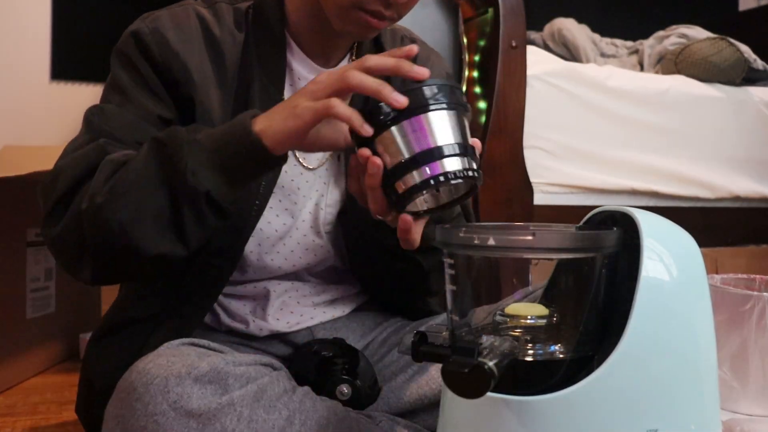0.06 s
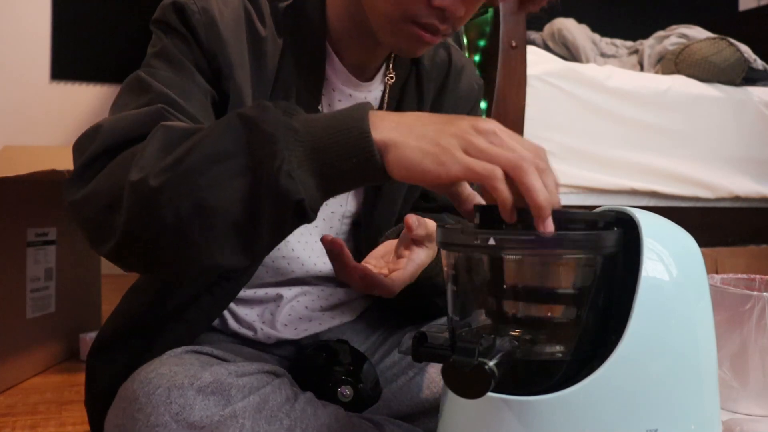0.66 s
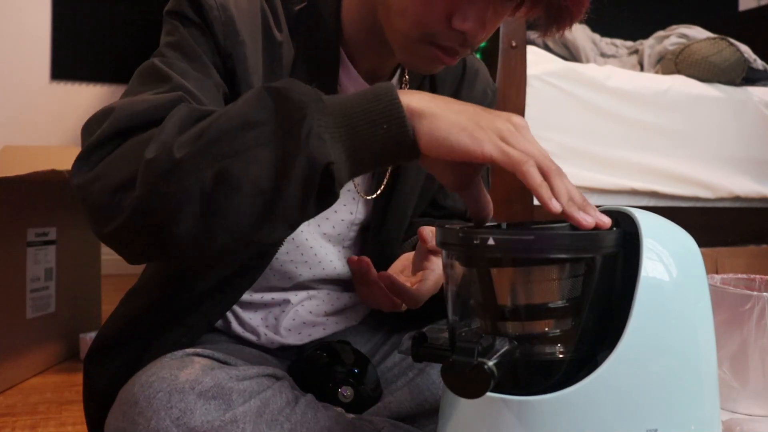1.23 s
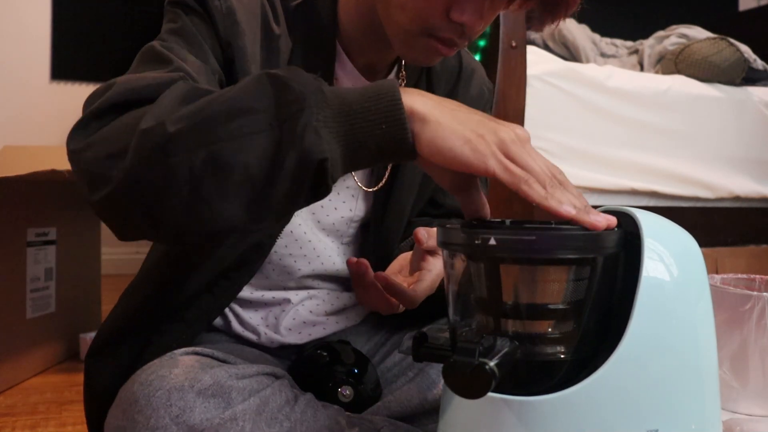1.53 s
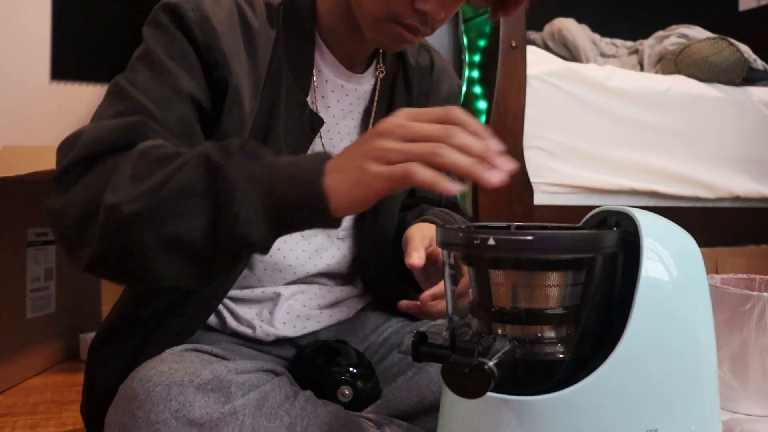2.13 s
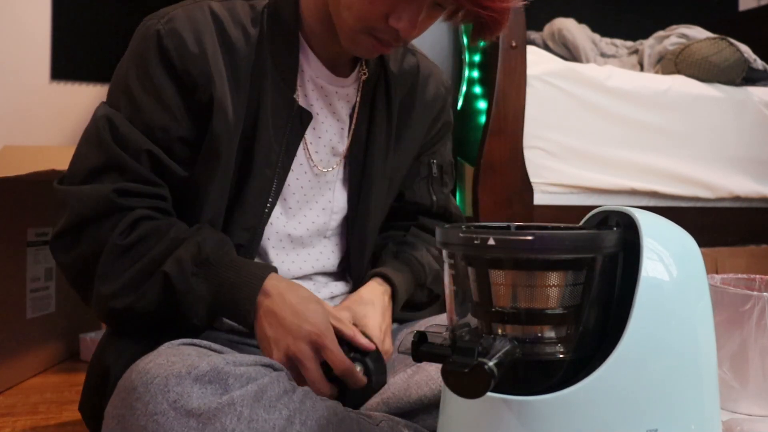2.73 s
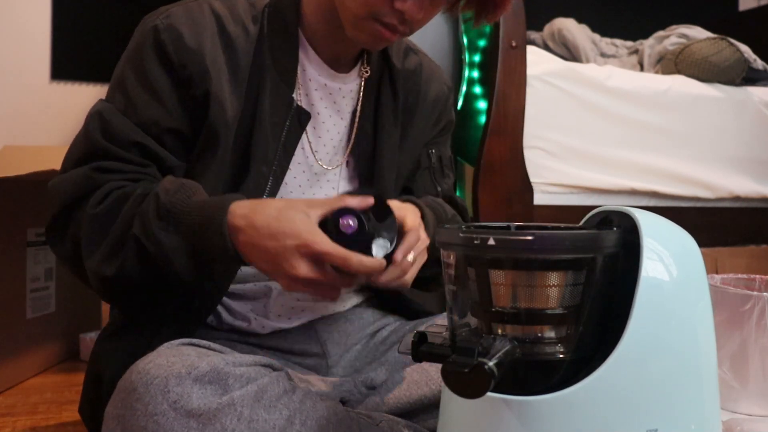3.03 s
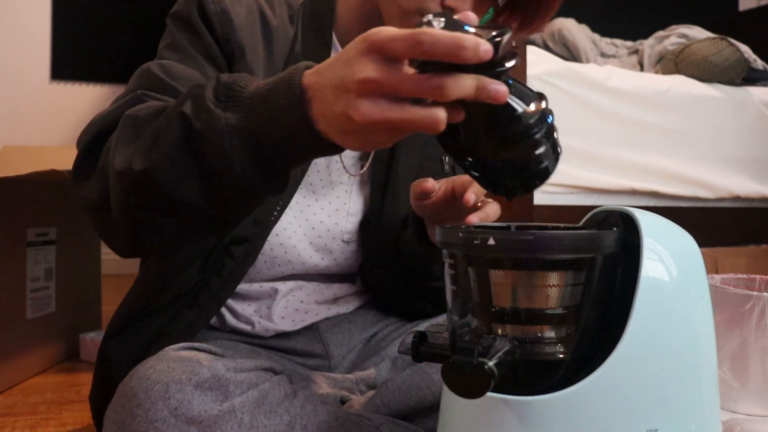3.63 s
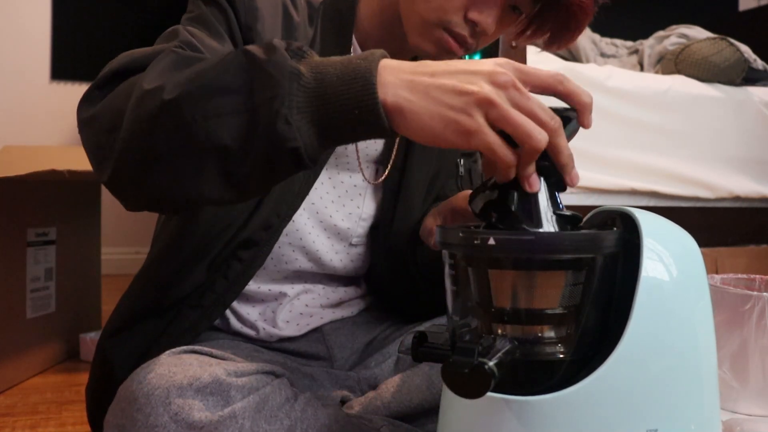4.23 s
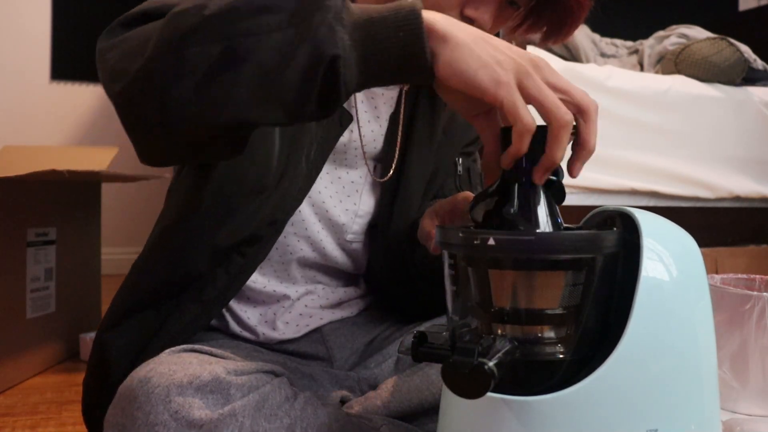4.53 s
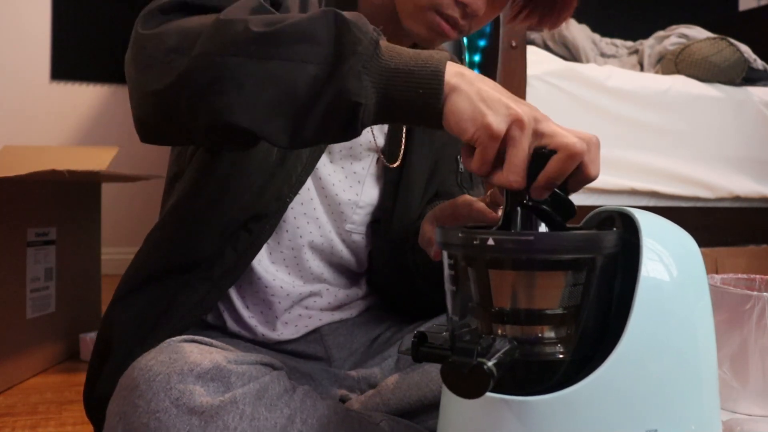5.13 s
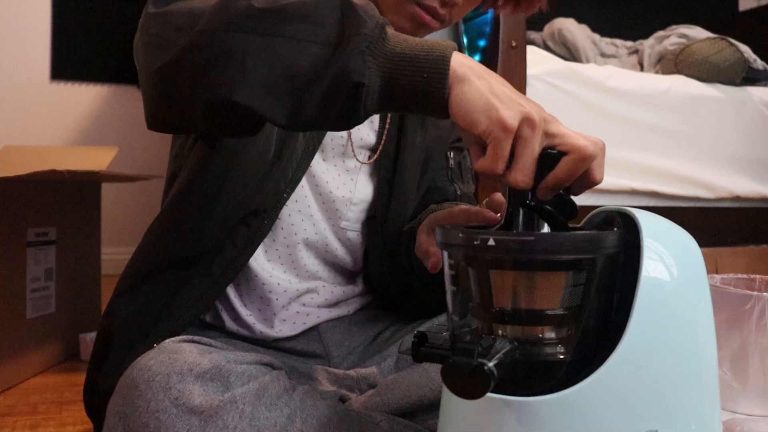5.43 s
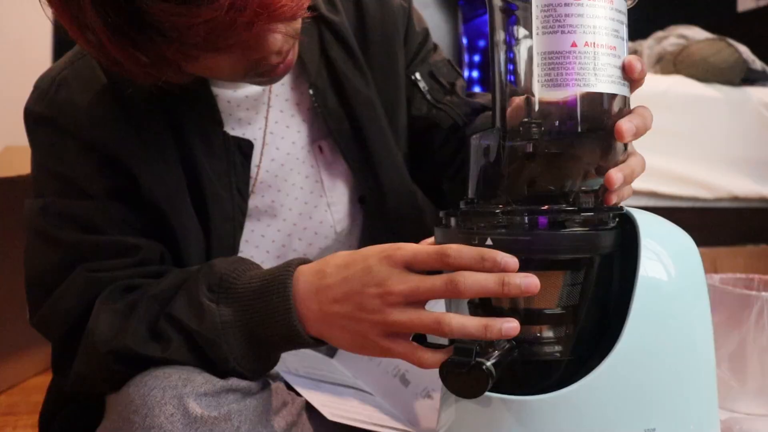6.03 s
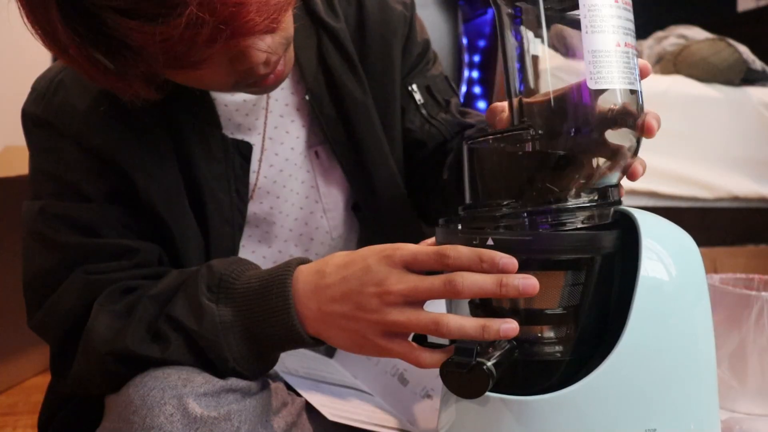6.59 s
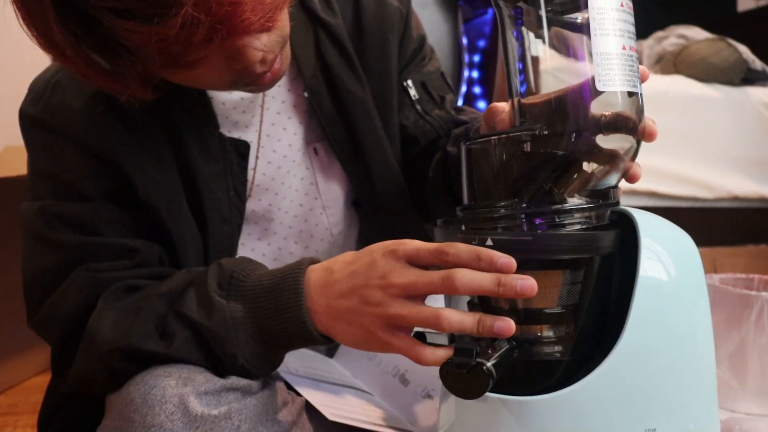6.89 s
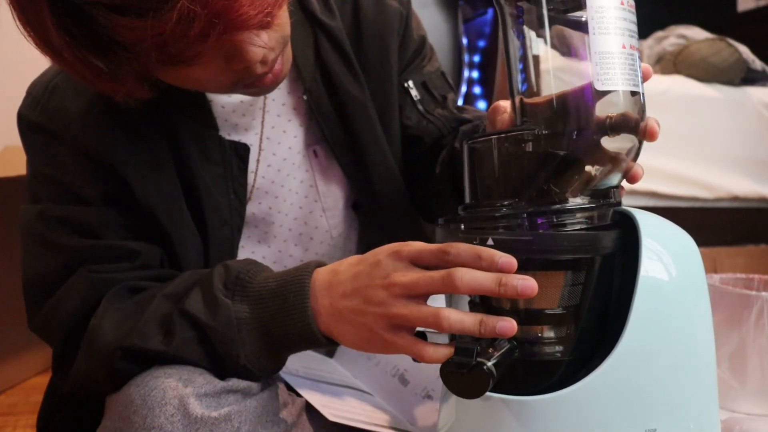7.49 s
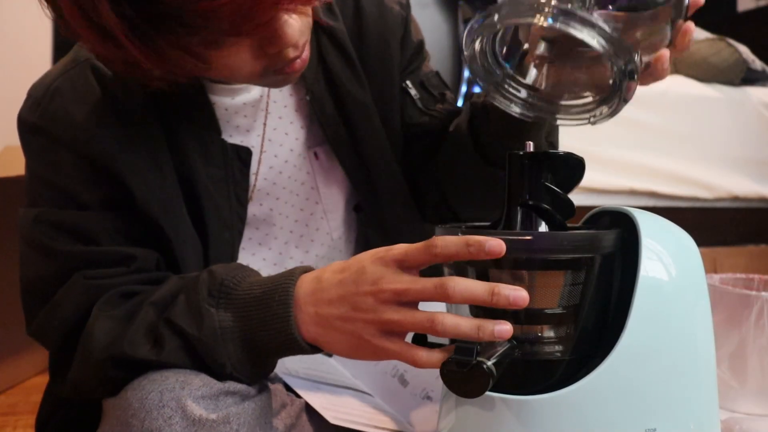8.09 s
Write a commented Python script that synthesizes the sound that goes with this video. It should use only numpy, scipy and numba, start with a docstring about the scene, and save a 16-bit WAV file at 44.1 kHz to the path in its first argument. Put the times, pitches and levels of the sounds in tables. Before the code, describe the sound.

A juicer is assembled close by in a small, quiet bedroom, over a faint steady appliance hum. A sleeve rustles softly, then at about 0.7 seconds a steel and plastic strainer clatters into the bowl, with smaller clicks until 1.2 seconds. At 1.8 it snaps home with a loud clack and a short hollow ring. Soft jacket rustles and swishes fill the gap until about 4 seconds. From 4.2 the pressing screw knocks and slides into place, grinding briefly and thumping the base on the floor near 4.9 and 5.1, where a hard clack sets the steel mesh ringing briefly. A few light ticks follow. From 6 to 7.7 seconds the plastic feed funnel rubs and clicks on the rim, with a faint squeak near 6.8 and the strongest knocks and scrape around 7.2 to 7.3. Two light taps come near 8 and 8.2 seconds as it lifts away.

```python
"""A sleeve rustles softly, then a steel and plastic strainer drops into a juicer's bowl and snaps home.
The auger (the pressing screw) is worked onto its shaft; the hopper (the feed funnel) is tried on the
rim and lifted off. Knocks make the parts ring, rubbing parts stick and slip, and the base thumps
the floor. It all happens close by in a small bedroom, over a faint appliance hum.
An automatic volume control turns the sound down after loud blows."""
import sys
import numpy as np
from scipy import signal
from scipy.fft import rfft, irfft
from scipy.io import wavfile
from scipy.ndimage import uniform_filter1d
from numba import njit

SR = 44100
rng = np.random.default_rng(int(sys.argv[2]) if len(sys.argv) > 2 else 0)


def store_pcm(level_fs):
    """Save levels as 16-bit WAV."""
    pcm = np.round(np.clip(level_fs, -1, 1) * 32767).astype(np.int16)
    wavfile.write(sys.argv[1], SR, np.atleast_2d(pcm).T)


N = 368235
TIME = np.arange(N) / SR
RING_TIME = TIME[:SR // 3]

# Each part's knocks. Clack (upper middle) and tick (treble) are compared with the body (lower middle).
# (time [s], relative force [dB], clack [dB], tick [dB], chatter time [s])
STRAINER_HITS = [(.6745, -5.5, -3.5, -18.5, 0.0023), (.7062, -22, -9.5, -10, 0.0037),
                 (.7287, -14, 4, -19.5, .0004), (.7417, -9, 3, -9, .0006), (.7545, -22.5, -5, -9.5, 0.0032),
                 (.799, -15.5, -11.5, -17, 0.0016), (.809, -20.5, -13.5, -15.5, .001),
                 (.934, -41, -7, -12.5, 0.0061), (.979, -9, -11.5, -26, 0.00055),
                 (1.043, -34, -3.5, -33, 0.0071), (1.065, -28.5, -3, -18, 0.0025),
                 (1.077, -24.5, -9.5, -19, 0.0031), (1.115, -37, -2, -24.5, 0.0059),
                 (1.153, -24, -9.5, -22, .003), (1.503, -27.5, -10.5, -17, 0.013),
                 (1.707, -44, -3.5, -21, 0.0085), (1.753, -29.5, -11.5, -27, 0.0059),
                 (1.768, -22.5, -3, -23, .012), (1.778, 0.5, -5, -13, .0046),
                 (2.122, -42, -5.5, -14, 0.0027)]
AUGER_HITS = [(2.539, -55, 5.5, -0.5, 0.0012), (4.2185, -28, -13, -25, 0.0021),
              (4.225, -28.5, -9.5, -23, 0.0021), (4.2435, -30, -1.5, -15, .004),
              (4.2493, -16.5, -12, -26.5, 0.0017), (4.3295, -25, -5.5, -20.5, 0.0043),
              (4.349, -19, -12.5, -23.5, 0.0045), (4.614, -27.5, -13, -21.5, 0.0034),
              (4.7645, -18, -16, -34, 0.0035), (4.778, -20, -8, -17, 0.0023),
              (4.868, -17, -5.5, -31, 0.0074), (4.893, -19, -13, -27, 0.0054), (4.921, -24, -5, -18, .004),
              (4.939, -31.5, -8, -15.5, 0.0067), (5.03, -24.5, -15, -29.5, 0.00085),
              (5.12, -23.5, 6, -9, 0.0072), (5.132, -12, -25, -24, 0.00051),
              (5.1405, -10, -6, -4.5, 0.0014), (5.1495, -12.5, -25.5, -22, 0.0031),
              (5.358, -45.5, -7.5, -23, 0.0026), (5.431, -44, -12, -23, .005),
              (5.47, -39.5, -13, -35, .006), (5.518, -33.5, -13, -26, .01), (5.538, -31.5, -6, -20, .003)]
HOPPER_HITS = [(6.031, -31, -4, -21, 0.0096), (6.127, -40.5, -5.5, -17, 0.0023),
               (6.304, -46, -4.5, -23, .003), (6.393, -48, -4.5, -30, 0.0012),
               (6.444, -46.5, -3, -23, 0.0022), (6.551, -21, -2.5, -13.5, 0.0068),
               (6.562, -23, -5, -13.5, 0.0033), (6.59, -27, -6.5, -16.5, 0.0056),
               (6.668, -26, -4.5, -21, 0.0047), (6.686, -18, -5.5, -18.5, 0.0026),
               (6.765, -32, -1, -28, 0.0013), (6.786, -25, -7, -20.5, 0.0077),
               (6.841, -38, -3, -11, 0.0089), (6.897, -32, -6, -12, 0.0025), (6.948, -31, -5, -19, 0.0052),
               (6.986, -40.5, -8, -12, 0.0023), (7.031, -36.5, -3.5, -20, 0.0099),
               (7.168, -30.5, -3, -12, 0.0021), (7.186, -14, -3.5, -19, 0.0052),
               (7.2725, -18.5, -0.5, -20, 0.0053), (7.285, -21.5, -17, -9, 0.011),
               (7.3155, -18.5, -4.5, -11, 0.0035), (7.349, -27.5, -6, -11.5, 0.0098),
               (7.375, -35.5, 0, -17, .0024), (7.513, -30, -6, -40, 0.0015),
               (7.522, -22, -3.5, -10.5, 0.0044), (7.535, -28.5, -2.5, -8, 0.0012),
               (7.567, -27.5, -5.5, -27, .008), (7.609, -38, -2, -21, 0.0031),
               (7.634, -34, -4, -26, 0.0047), (7.753, -47, -4, -12, 0.0044), (7.812, -43, -8, -42, .002)]
LIFTED_TAPS = [(7.973, -39.5, -3.5, -15, 0.0057), (8.224, -42.5, -5.5, -8.5, 0.0025)]  # the lifted hopper grazes the auger
# borders of the bass, body, clack and tick bands (frequency [Hz])
BAND_EDGES = [130, 540, 1100, 3400, 15000]
# Modes are the tones a part rings with; a ring time (t60) is how long one takes to fade by 60 dB.
# (pitch [Hz], level above the part's click [dB], ring time [s])
STRAINER_MODES = [(170, -6, 0.037), (425, 13.5, 0.043), (607, 6.5, 0.13), (674, 12.5, 0.047),
                  (714.4, 17, 0.095), (832, 16.5, .03), (1410, 11.5, 0.011), (1340, 6, 0.014),
                  (1744, 8.5, 0.013), (2010, 5.5, 0.02), (2544, 13.5, 0.023), (3810, 11, 0.032),
                  (6400, -7, .005), (8300, 4, 0.0017)]
AUGER_MODES = [(451, 13.2, 0.033), (630, 14.4, 0.034), (708, 8.2, 0.067), (750, 4.6, 0.08),
               (1426, 12.3, 0.029), (1845, 8, 0.0068), (2340, 2.3, 0.019), (2700, 3, 0.016),
               (3020, 2.8, .022), (5630, 2.5, .008), (8550, 3, 0.01)]
HOPPER_MODES = [(417, 19.9, 0.062), (480, 10.8, 0.033), (586, 2, 0.0079), (708, 9.5, 0.032),
                (920, 1.3, 0.094), (1399, 14.1, 0.014), (1896, 12, 0.0041), (2580, 1.6, 0.0072),
                (3300, 0.61, 0.06), (3940, 3.4, 0.014), (7800, 3.6, 0.0055)]
# tones of the steel mesh and the bowl (pitch [Hz], relative level [dB], ring time [s])
MESH_MODES = [(5300, -8, .22), (5870, -9, 0.22), (5670, 5, .15), (5560, 1.5, .15), (6120, -5.5, 0.24),
              (6030, -11, 0.18), (6900, 8.5, 0.15)]
BOWL_MODES = [(315, -5.5, 0.27), (550, 0, .16), (690, -1, .2), (757, -1, .22), (876, -5, .2)]
# blows that set the mesh and the bowl ringing (time [s], level [dB])
MESH_HITS = [(0.7412, -51.5), (4.775, -46.5), (5.1378, -18.5)]
BOWL_HITS = [(.7417, -33), (1.778, -23), (5.1405, -31)]
# pushes that rock the motor base (time [s], level [dB], ring time [s])
THUMPS = [(0.676, -35.5, 0.042), (4.249, -47, .18), (4.347, -49, .24), (4.868, -31.5, .3),
          (5.119, -25, .27), (6.561, -47, 0.19), (6.686, -51, .17), (7.297, -43, 0.071)]
# rubbing strokes (middle time [s], length [s], level [dB])
AUGER_GRIND = [(4.871, 0.0086, -21.5), (4.905, 0.016, -20.5), (5.118, 0.02, -12)]  # the auger's ridges grind down the shaft
RIM_RUB = [(6.3, .4, -57), (6.61, 0.053, -33), (6.9, 0.98, -43.5), (7.2, 0.19, -38.5), (7.32, 0.07, -22.5),
           (7.59, 0.14, -41)]  # the hopper's rim turns on the bowl
BOWL_RUB = [(.645, .025, -45), (4.52, .28, -53), (4.665, .03, -46.5), (4.82, .3, -50.5)]  # a part slides down inside the bowl
ARM_MOVES = [(.07, 0.42, -54.5), (.68, 0.59, -59), (1.5, 1.8, -62), (2.45, .55, -53), (3.02, 0.28, -55),
             (3.33, 0.34, -55.5), (3.85, 1.1, -60.5), (5.94, 0.27, -52), (7.3, 1.1, -60)]  # the jacket sleeve rustles
# squeals of the turning rim (time [s], length [s], pitch [Hz], level [dB])
SQUEAKS = [(6.781, 0.084, 3990, -52.5), (7.066, 0.077, 3960, -65)]
# quick sleeve swishes (time [s], length [s], first pitch [Hz], last pitch [Hz], level [dB])
SWISHES = [(2.269, .13, 1466, 980, -51), (3.22, 0.16, 1416, 2040, -49.5)]
# how each noise is spread from low to high (frequency [Hz], relative level [dB])
GRIND_SPECTRUM = [(120, -7.5), (300, 14), (700, -9.5), (1200, -7), (2100, 0.5), (3400, -4), (5000, -14.5),
                  (9000, -23.5), (15000, -34.5)]
RIM_SPECTRUM = [(60, -12), (160, 2), (700, -0.5), (2000, -15), (4000, -16.5), (8500, -26), (10500, -32.5),
                (15500, -32)]
SLIDE_SPECTRUM = [(300, -2), (1200, -8), (2500, -4.5), (3700, -1.5), (5500, -11), (8500, -16.5),
                  (15000, -34)]
CLOTH_SPECTRUM = [(200, -26.5), (700, -1.5), (1400, 3), (2600, -1.5), (5000, -8), (8500, -10.5),
                  (10500, -16.5), (15500, -19.5)]
AIR_SPECTRUM = [(15, -43), (25, -8), (75, -5), (274, -7), (313, -7), (368, -3), (410, -8), (482, -5.5),
                (552, -13), (684, -12.5), (945, -11.5), (1300, -16), (2010, -22.5), (8130, -29.5),
                (15500, -34)]
MESH_SPECTRUM = [(3000, -30), (5200, 1), (5800, 9), (6700, 3.5), (7400, -24), (14000, -27)]
THUMP_SPECTRUM = [(12, -25.5), (32, -1), (50, 0), (80, 0.5), (130, -2), (230, -25.5), (900, -69)]
# echoes from the floor and nearby furniture (delay [s], gain [ratio])
REFLECTIONS = [(.0033, -0.012), (.0058, -0.25), (0.0138, .2), (0.016, -0.054)]
# tones of the appliance hum (pitch [Hz], average level [dB])
HUM = [(70, -63.5), (118.4, -66.5), (366.1, -59), (990.5, -84)]


def knocks(hits, modes, gain_db, chatter, room_db, low_hz):
    """Each knock is one blow and a burst of tiny bounces (chatter) that make the part ring."""
    out = np.zeros(N)
    n, attack = len(RING_TIME), int(.03 * SR)
    band_filters = [signal.butter(3, edges, "band", fs=SR, output="sos")
                    for edges in zip(BAND_EDGES, BAND_EDGES[1:])]
    for s, db, bass_db, clack_db, tick_db, chatter_s in hits:
        age = 2 * RING_TIME / max(chatter_s, 1e-4)
        force = chatter * slips(n, 5000, 4.7) * age * np.exp(1 - age)
        force[0] += 1  # the blow itself
        early, tail = room(room_db)
        echoed = signal.fftconvolve(force, early)[:n] + np.linalg.norm(force) * tail
        sound = signal.fftconvolve(echoed, tap(modes))[:n]
        # a soft contact lasts longer and loses its treble
        pole = np.exp(-2 * np.pi * 8000 * amp(0.89 * tick_db) / SR)
        sound = signal.lfilter([1 - pole], [1, -pole], sound)
        # plastic muffles the very top, and small parts give off little bass
        top_hz = min(11500 * amp(0.33 * tick_db), SR / 3)
        sound = signal.lfilter(*signal.butter(2, top_hz, fs=SR), sound)
        sound = signal.lfilter(*signal.butter(1, low_hz, "high", fs=SR), sound)
        # set how loud each band starts, then add the bands up
        bands = np.array([signal.sosfilt(sos, sound) for sos in band_filters])
        levels = amp(gain_db + db + np.array([bass_db, 0, clack_db, tick_db]))
        add(out, s, (levels / bands[:, :attack].std(axis=1)) @ bands)
    return out


def contacts(rows, bass_db, bass_fall, settle_db, settle_bass_db, settle_tick_db, most_bass_db=6):
    """List each blow and the weaker, deeper touch that follows as the part settles."""
    hits = []
    settle_delay_s, settle_chatter_s, usual_force_db = .011, 0.0043, -25
    for s, db, clack_db, tick_db, chatter_s in rows:
        # gentle blows have a bigger share of bass
        bass = min(bass_db - bass_fall * (db - usual_force_db), most_bass_db)
        # a loose part chatters longer and settles louder: 3.5 dB per doubling
        touch_db = db + settle_db + 3.5 * np.log2(chatter_s / settle_chatter_s)
        hits.append((s, db, bass, clack_db, tick_db, chatter_s))
        hits.append((s + settle_delay_s, touch_db, bass + settle_bass_db,
                     clack_db, tick_db + settle_tick_db, settle_chatter_s))
    return hits


def tap(modes, scatter_db=4.0):
    """One tap gives a click and fading tones, a little different at each spot on the part."""
    hz, db, t60 = np.transpose(modes)[:, :, None]
    size, shift = rng.standard_normal((2, len(modes), 1))
    hz = hz * (1 + .01 * shift)
    t = TIME[:SR // 16]
    peak = amp(db - scatter_db * size) * 2 * np.log(1000) / (t60 * SR)
    sound = np.sum(peak * amp(-60 * t / t60) * np.cos(2 * np.pi * hz * t), axis=0)
    sound[0] += 1  # the click
    return sound


def mesh(t60=0.23, tones_db=-14.5):
    """The strainer's thin steel has a crowd of close tones that shimmer after a blow."""
    out, t = np.zeros(N), TIME[:SR // 2]
    for s, db in MESH_HITS:
        shimmer = colour(rng.standard_normal(len(t)), MESH_SPECTRUM) * amp(-60 * t / t60)
        tones = ring(MESH_MODES, t, scatter_db=7.0, detune=0.0027)
        add(out, s, amp(db) * (shimmer + amp(tones_db) * tones / tones[:SR // 40].std()))
    return out


def bowl():
    """The bowl's low tones hum on after the crack of a hard blow."""
    out = np.zeros(N)
    for s, db in BOWL_HITS:
        add(out, s, amp(db) * ring(BOWL_MODES, RING_TIME, scatter_db=1.5, detune=.008))
    return out


def grinding():
    """Pressed onto its shaft, the auger sticks and slips in quick bursts that make it ring."""
    grit = colour(slips(N, 7000, 1.5), GRIND_SPECTRUM)
    return unit(signal.fftconvolve(grit, tap(AUGER_MODES))[:N]) * strokes(AUGER_GRIND)


def rubbing():
    """The rim sticks and slips, ringing the hopper; smooth parts slide with a fine hiss."""
    grit = colour(slips(N, 700, 1.6), RIM_SPECTRUM)
    rim = unit(signal.fftconvolve(grit, tap(HOPPER_MODES))[:N])
    slide = colour(slips(N, 5000, 1.5), SLIDE_SPECTRUM)
    return rim * strokes(RIM_RUB) + slide * strokes(BOWL_RUB)


def thumps(rise_s=0.0017):
    """The heavy base rocks on the floor with a low rumble."""
    out, t = np.zeros(N), TIME[:SR // 2]
    for s, db, t60 in THUMPS:
        rumble = colour(rng.standard_normal(len(t)), THUMP_SPECTRUM)
        rumble *= amp(-60 * t / t60) * (1 - np.exp(-t / rise_s))
        add(out, s, amp(db) * rumble / rumble[:SR // 20].std())
    return out


def squeaks(octave_db=-1):
    """Plastic turning on plastic gives a wavering squeal, with a rougher tone an octave above."""
    out = np.zeros(N)
    for s, length, hz, db in SQUEAKS:
        n = int(length * SR)
        phase = 2 * np.pi * hz * TIME[:n]
        squeal = wander(per_s=90)[:n] * np.sin(phase)
        octave = amp(octave_db) * wander(per_s=1400)[:n] * np.sin(2 * phase)
        add(out, s, amp(db) * np.hanning(n) * (squeal + octave))
    return out


def sleeve(flutter_db=1.3, rest_db=-73):
    """Cloth fibres catch on each other; the ribbed weave sings with the speed of the arm."""
    rustle = colour(slips(N, 16000, 1.3), CLOTH_SPECTRUM)
    out = rustle * (strokes(ARM_MOVES) + amp(rest_db)) * amp(flutter_db * wander(per_s=27))
    for s, length, from_hz, to_hz, db in SWISHES:
        n = int(length * SR)
        glide = np.sin(2 * np.pi * np.cumsum(np.linspace(from_hz, to_hz, n)) / SR)
        add(out, s, amp(db) * np.hanning(n) * wander(per_s=180)[:n] * glide)
    return out


def room(tail_db, t60=0.24, build_s=0.0027):
    """Sound arrives directly, then as a few near echoes and the bedroom's short, blurred tail."""
    t = RING_TIME
    early = np.zeros(len(t))
    early[0] = 1
    for delay, gain in REFLECTIONS:
        early[int(delay * SR)] += gain
    tail = rng.standard_normal(len(t)) * amp(-60 * t / t60) * (1 - np.exp(-t / build_s))
    return early, amp(tail_db) * tail / np.linalg.norm(tail)


def background(air_db=-54.0):
    """Still room air and an appliance hum whose level drifts slightly."""
    hum = sum(np.sqrt(2) * amp(db + wander(per_s=2.3)) * np.sin(2 * np.pi * hz * TIME) for hz, db in HUM)
    return hum + amp(air_db) * colour(rng.standard_normal(N), AIR_SPECTRUM)


def ring(modes, t, scatter_db, detune):
    """Fading tones whose level and pitch vary a little with where the blow lands."""
    hz, db, t60 = np.transpose(modes)[:, :, None]
    size, shift = rng.standard_normal((2, len(modes), 1))
    fade = amp(db + scatter_db * size - 60 * t / t60)
    return np.sum(fade * np.sin(2 * np.pi * hz * (1 + detune * shift) * t), axis=0)


def slips(n, per_s, spread_db):
    """Tiny random clicks of uneven size, as surfaces catch and let go."""
    slipping = rng.random(n) < per_s / SR
    return slipping * rng.standard_normal(n) * amp(spread_db * rng.standard_normal(n))


def strokes(rows):
    """Each hand stroke swells and fades, staying within about 6 dB of its peak for its length."""
    powers = (amp(db) ** 2 * 0.22 ** np.minimum((2 * (TIME - s) / length) ** 2, 20)
              for s, length, db in rows)
    return np.sqrt(sum(powers))


def wander(per_s):
    """A smooth random drift, about 1 in size."""
    hold = int(SR / per_s)
    steps = np.repeat(rng.standard_normal(N // hold + 1), hold)
    return unit(uniform_filter1d(steps, hold)[:N])


def colour(x, spectrum):
    """Shape the lows and highs of x, at an average level of 1."""
    hz, db = np.transpose(spectrum)
    bin_hz = np.fft.rfftfreq(len(x), 1 / SR) + 1
    gain = amp(np.interp(np.log(bin_hz), np.log(hz), db))
    return unit(irfft(rfft(x) * gain, len(x)))


def amp(db):
    """Turn decibels into gain."""
    return 10 ** (np.asarray(db) / 20)


def unit(x):
    """Scale to an average (rms) level of 1."""
    return x / np.sqrt(np.mean(x ** 2) + 1e-20)


def add(track, s, sound):
    """Mix a sound in at s seconds."""
    i = int(s * SR)
    track[i:i + len(sound)] += sound[:N - i]


@njit
def follow(x, attack, release):
    """Track the level of x, rising fast and falling slowly."""
    out, level = np.empty(len(x)), 0.
    for i in range(len(x)):
        level += (x[i] - level) * (attack if x[i] > level else release)
        out[i] = level
    return out


def scene():
    """Strainer, auger and hopper in turn, with the handling noise around them, in mono."""
    drop = contacts(STRAINER_HITS, bass_db=0.5, bass_fall=0.54,
                    settle_db=-17.5, settle_bass_db=14, settle_tick_db=1)
    push = contacts(AUGER_HITS, bass_db=-4, bass_fall=0.43,
                    settle_db=-11.5, settle_bass_db=8.5, settle_tick_db=-1.5, most_bass_db=-1)
    turn = contacts(HOPPER_HITS, bass_db=0.5, bass_fall=0.3,
                    settle_db=-17, settle_bass_db=13, settle_tick_db=-1)
    lift = contacts(LIFTED_TAPS, bass_db=-19, bass_fall=.05,  # these settle brighter instead
                    settle_db=-10, settle_bass_db=-4, settle_tick_db=3)
    strainer = knocks(drop, STRAINER_MODES, gain_db=-6, chatter=0.31, room_db=-6.5, low_hz=70.4)
    auger = knocks(push, AUGER_MODES, gain_db=-2.5, chatter=0.44, room_db=-10.5, low_hz=377)
    hopper = knocks(turn + lift, HOPPER_MODES, gain_db=-5, chatter=0.78, room_db=-6.5, low_hz=238)
    ringing = mesh() + bowl()
    friction = rubbing() + grinding() + squeaks()
    return (strainer + auger + hopper + ringing + friction + thumps() + sleeve() + background())[None]


def record(dry, attack_s=0.012, release_s=0.94):
    """The volume dips after loud blows, the sharpest peaks clip, and the highest treble is cut."""
    level = follow(np.abs(dry[0]), 1 / (attack_s * SR), 1 / (release_s * SR))
    dip_db = 14 * np.clip(level - .15, 0, 1)
    treble_cut = signal.ellip(8, .2, 70, 15900, fs=SR, output="sos")
    return signal.sosfilt(treble_cut, np.clip(dry * amp(-dip_db), -1, 1))


dry = scene()
out = record(dry)
store_pcm(out)
```